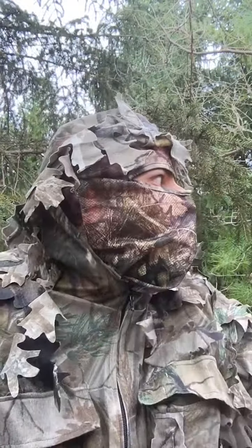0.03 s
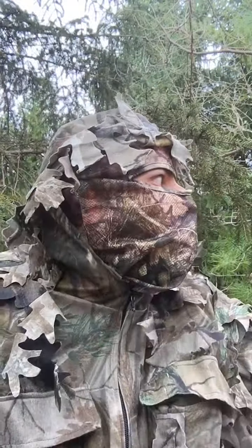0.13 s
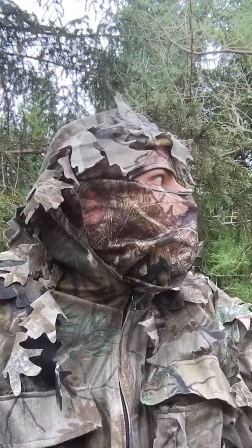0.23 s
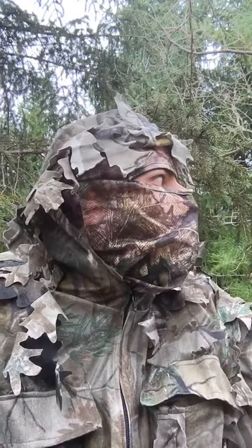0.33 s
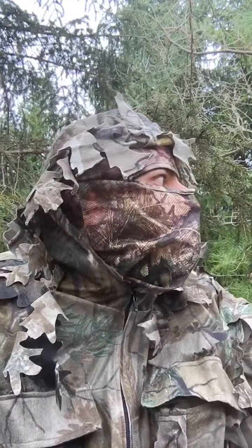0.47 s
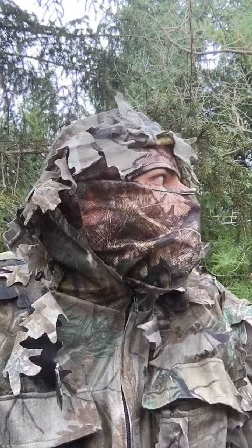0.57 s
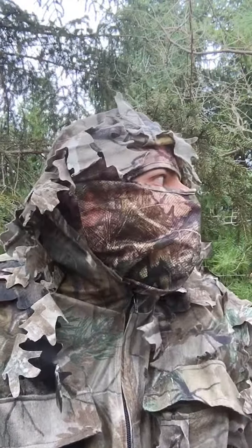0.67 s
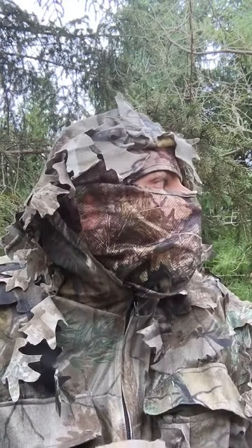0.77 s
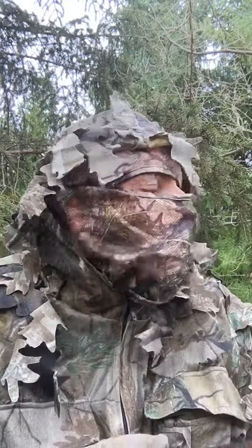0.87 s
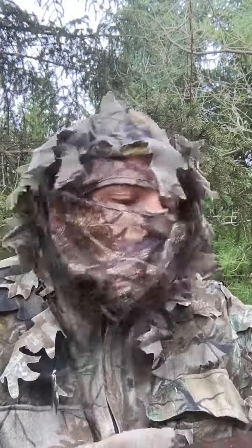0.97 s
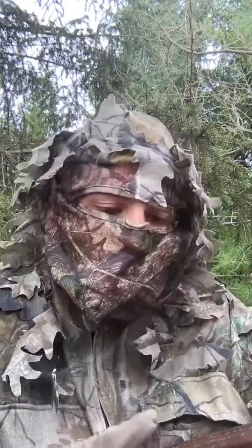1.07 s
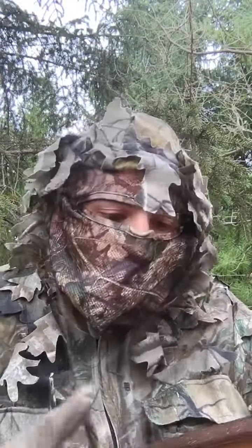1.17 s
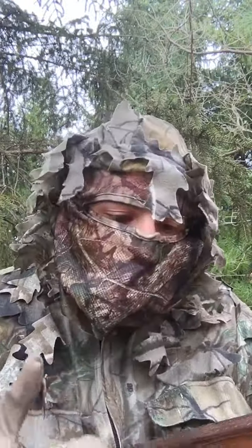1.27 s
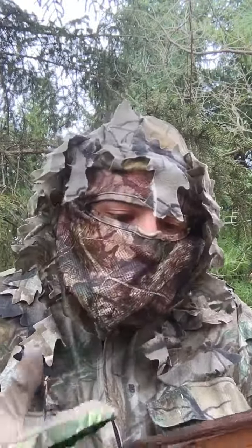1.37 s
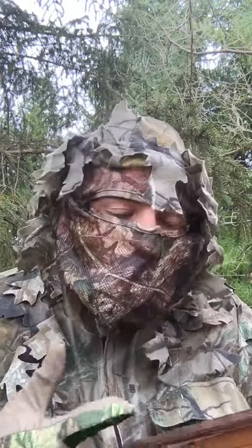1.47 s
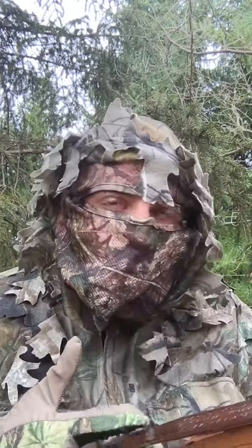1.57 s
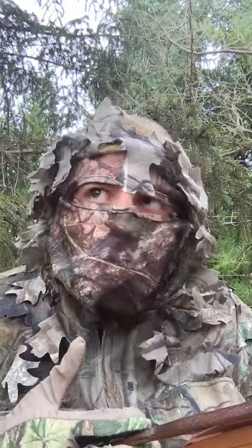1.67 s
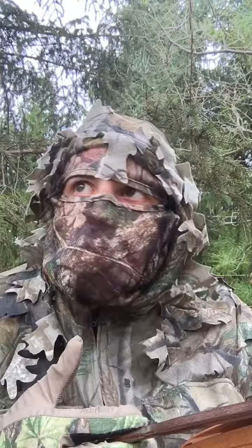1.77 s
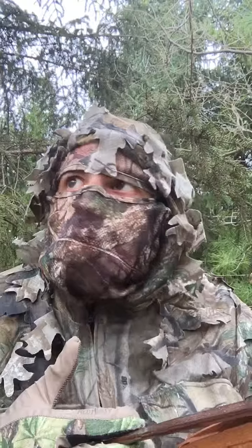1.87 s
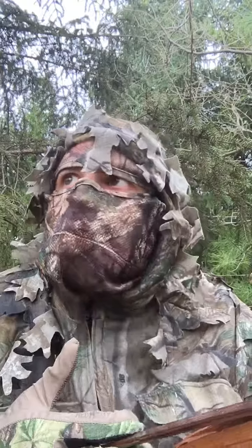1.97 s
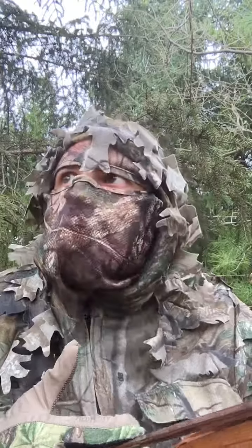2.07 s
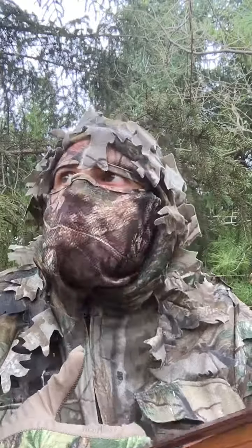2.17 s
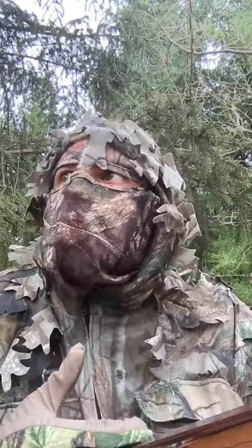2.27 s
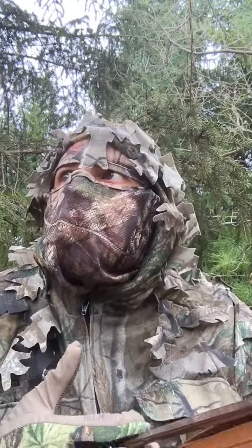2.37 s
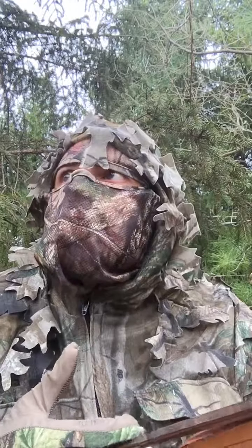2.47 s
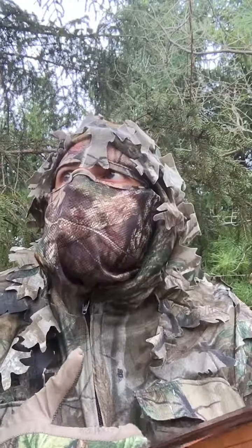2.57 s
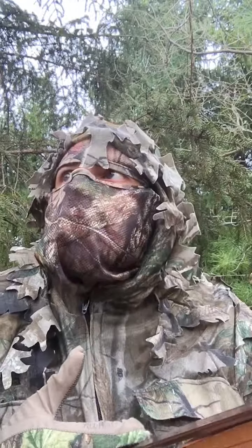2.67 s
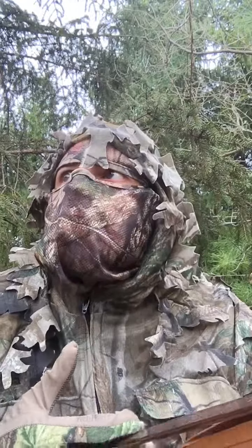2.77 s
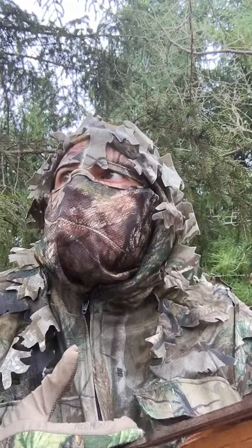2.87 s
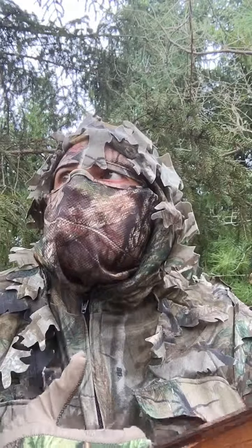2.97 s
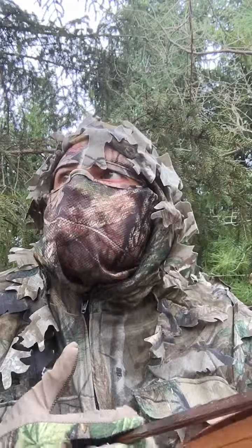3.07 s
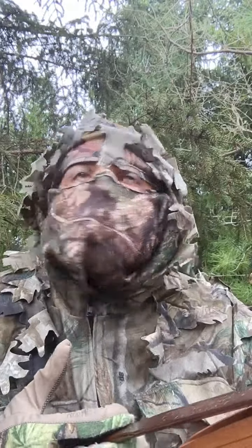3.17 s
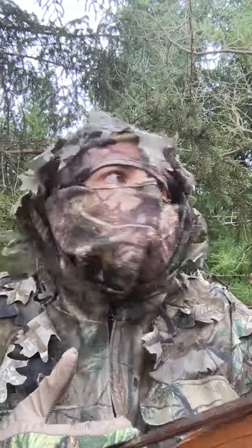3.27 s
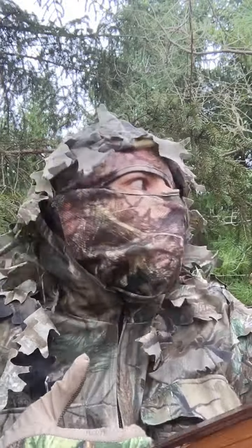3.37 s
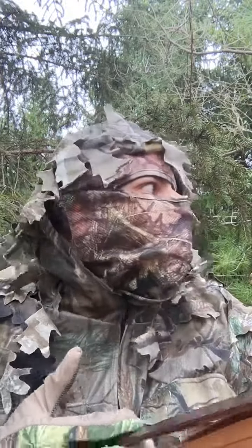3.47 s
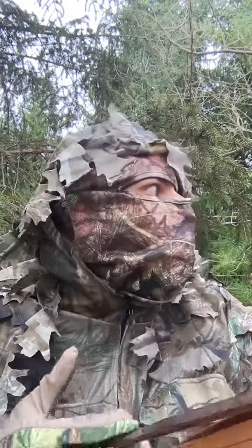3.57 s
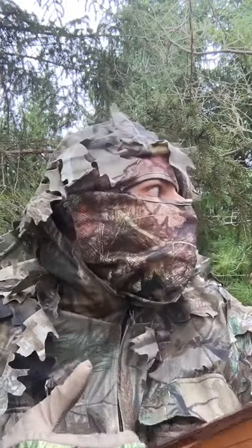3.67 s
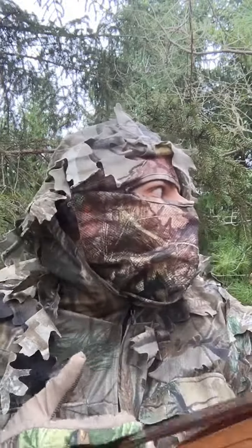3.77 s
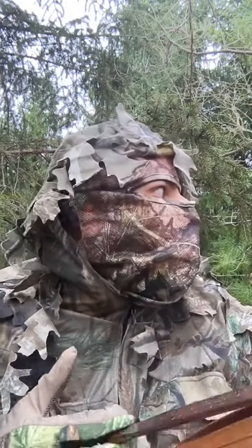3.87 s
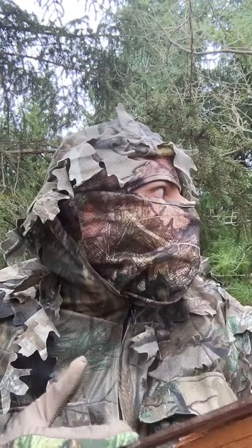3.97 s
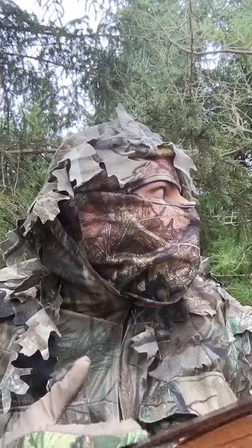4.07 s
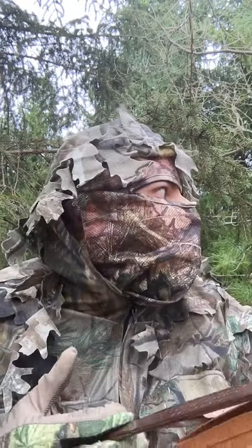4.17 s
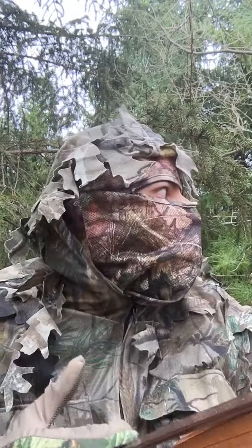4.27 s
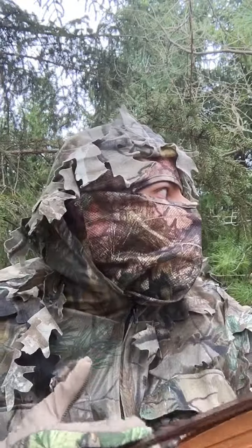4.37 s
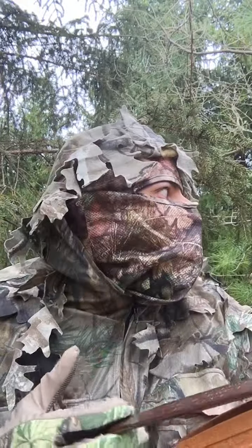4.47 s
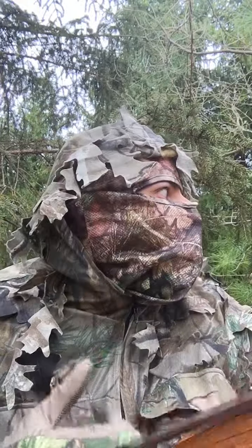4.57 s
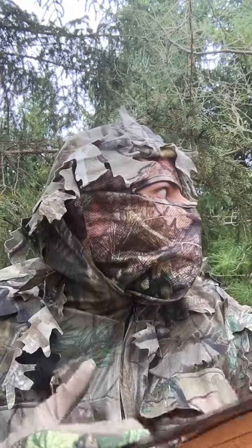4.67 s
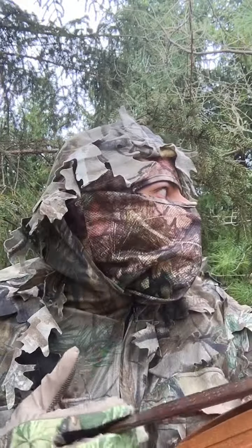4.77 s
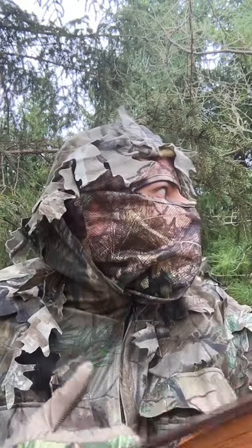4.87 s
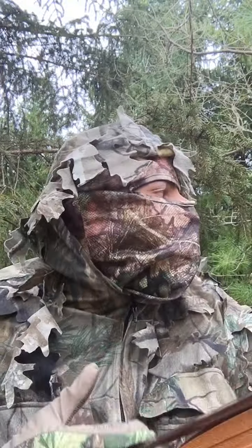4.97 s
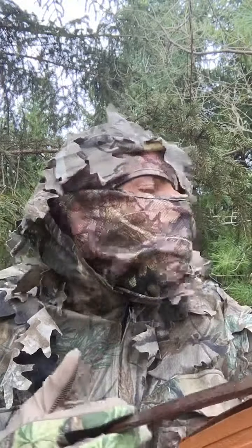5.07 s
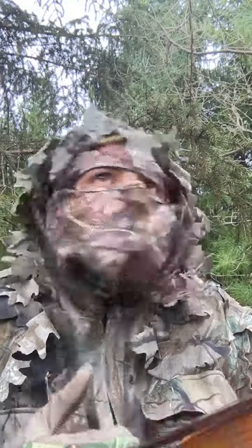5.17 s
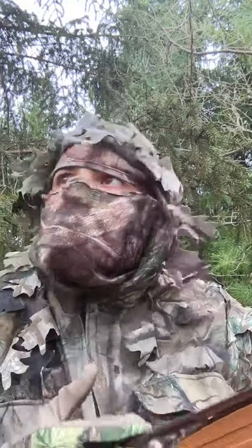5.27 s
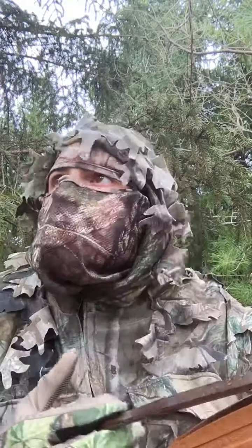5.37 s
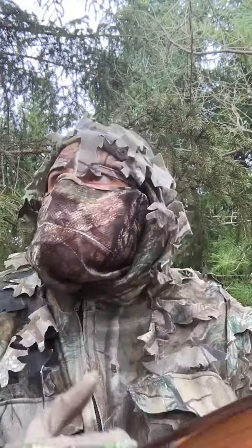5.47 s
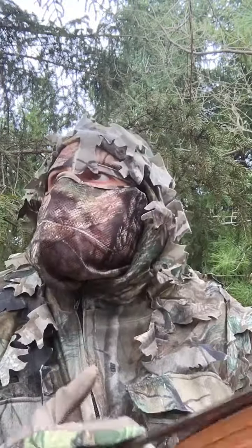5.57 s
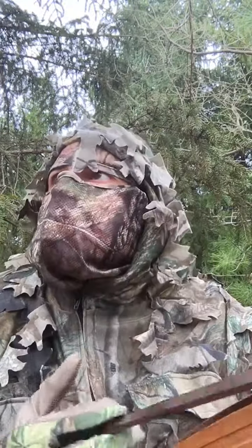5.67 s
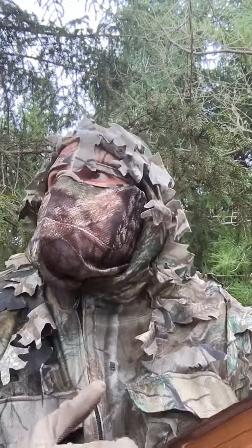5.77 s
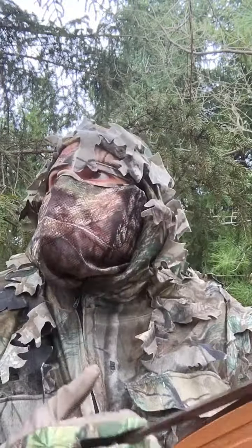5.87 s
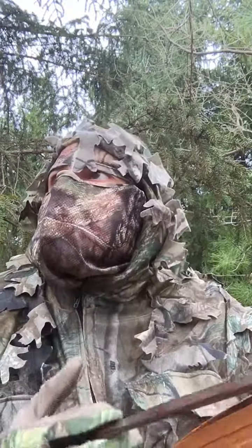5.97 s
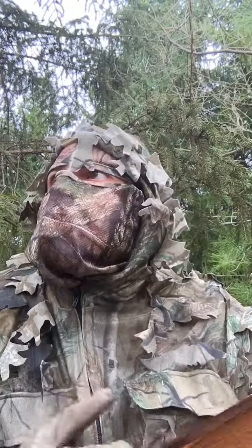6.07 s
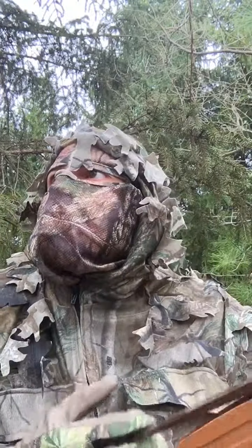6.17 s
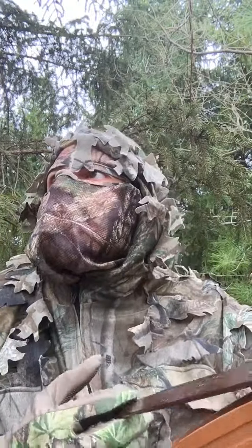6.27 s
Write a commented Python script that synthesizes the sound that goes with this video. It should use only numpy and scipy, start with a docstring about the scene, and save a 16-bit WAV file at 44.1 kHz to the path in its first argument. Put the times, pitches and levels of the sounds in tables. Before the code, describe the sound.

After a soft clothing rustle and a few wooden taps, a hand-worked box call yelps steadily like a hen turkey.

```python
"""In a quiet wood a far bird chirps once; then clothing rustles close by.
The lid of a hand-worked wooden box call taps on the box and is drawn over the rim in a run of raspy
yelps, with more taps among the first few. In each yelp the wood sticks and slips several hundred times
a second, exciting the resonances of the hollow box; a high note breaks to a low one, and the freed lid
rings. After each stroke the trees answer with faint reflections."""
import sys
import numpy as np
from scipy import signal
from scipy.fft import rfft, irfft, next_fast_len
from scipy.io import wavfile
from scipy.ndimage import uniform_filter1d, minimum_filter1d, map_coordinates

SR = 44100
rng = np.random.default_rng(int(sys.argv[2]) if len(sys.argv) > 2 else 0)


def wav_record(signal):
    """Record a signal, one row per channel, as 16-bit PCM in the file named by sys.argv[1]."""
    frames = np.transpose(np.atleast_2d(signal))
    bounded = np.clip(frames, -1, 1)
    # unit amplitude maps onto the largest positive 16-bit level
    quanta = np.round(bounded * 32767).astype(np.int16)
    wavfile.write(sys.argv[1], SR, quanta)


N = 278182


def box_call():
    """Source and resonator: the lid radiates directly, while forces on the rim are filtered by the box."""
    yelp_sound, yelp_force = yelps()
    tap_sound, tap_force = lid_taps()
    return yelp_sound + tap_sound + signal.fftconvolve(yelp_force + tap_force, box_response())[:N]


def yelps(friction_db=-1, click_db=5, free_hz=960, free_t60=0.044, free_lead_s=0.0045):
    """Forced, then free vibration: each stroke clicks, drives the lid by friction and leaves it ringing."""
    # strokes: (time [s], length [s], break after [s], high note [Hz], its glide [Hz/s], low note [Hz],
    # force [dB], high-note roughness [1], low-note roughness [1], high-note treble [dB],
    # low-note treble [dB], ring of the freed lid [dB])
    strokes = [ (2.304, .024, 0.0076, 763, -2000, 627, -12.5, 0.2, .08, -0.5, 2, -22.5),
               (2.626, .100, .066, 770, -900, 657, -12, .2, 0.1, -5, 2, -34),
               (3.034, 0.038, .012, 808, -5000, 633, -7, 0.8, 0.7, 5, -5, -13),
               (3.395, .083, .042, 786.4, -600, 675.2, -8.5, 0.4, 0, 4, -1.5, -18),
               (3.774, .024, 0.0083, 812.3, -2000, 627.6, -4.5, 0.3, .15, 6, 0, -10),
               (4.081, 0.05, .014, 743, -2.5, 667, -6.5, 1.2, 0.2, 1, -1.5, -13.5),
               (4.378, 0.054, 0.018, 781.3, -3800, 668, -9.5, .3, 0.6, 8.5, -4.5, -21.5),
               (4.669, 0.067, .049, 775, 2199.5, 673, -5.5, .35, 0.2, -0.5, -2.5, -16),
               (4.969, 0.068, .035, 775.3, 0, 678.5, -5, 0.3, .08, 7.5, -0.5, -3.5),
               (5.264, 0.054, 0.013, 767.7, -3000, 666.7, -3, .5, 0.3, 6.5, -1, -9),
               (5.560, 0.067, .045, 784.5, -400, 678.4, -5, .3, 0, 6.5, 4, -14.5),
               (5.839, 0.067, .036, 767.2, -200, 675, -8.5, 0.4, .2, 6, 2.5, -13),
               (6.136, 0.062, .039, 837, -5500, 504.6, -9.5, 0.2, 0.6, 3, -2, -5)]
    lid, rim_force = np.zeros(N), np.zeros(N)
    for start, length, break_s, high_hz, glide, low_hz, force_db, *timbre, free_db in strokes:
        squeal, friction = stick_slip(length, (break_s, high_hz, glide, low_hz, force_db, *timbre))
        add(lid, start, squeal)
        add(rim_force, start, amp(friction_db) * friction)
        add(rim_force, start, amp([force_db + click_db]))
        add(lid, start + length - free_lead_s, ringing([(free_hz, free_db, free_t60)], attack_s=0.00045))
    return lid, rim_force


def stick_slip(length, shape, waver=0.016, flicker_db=4.0, limp=0.7, scrape=0.93, squeal_db=-1.0,
               treble_hz=2500, size=5500):
    """Stick-slip friction is a relaxation oscillation; returns the lid's squeal and the force on the rim."""
    t = np.arange(size) / SR
    left_s = length - t
    rate_hz, force_db, rough, bright_db = gesture(t, length, *shape)
    cycles = np.cumsum(rate_hz * (1 + waver * rough * wobble(300, size))) / SR
    # period doubling: long and short slips alternate, adding lines halfway between the harmonics
    k = np.arange(2, 49)[:, None] / 2
    strength = np.where(k % 1 == 0, 1, limp * rough * np.sqrt(rough))
    # sliding over the grain modulates each partial's level and phase independently
    swell_db = np.array([wobble(110, size) for _ in k]) * flicker_db * np.sqrt(rough) * np.minimum(k / 2, 2)
    stray = np.array([wobble(380, size) for _ in k]) * (rough * np.sqrt(k) + (k / 15) ** 2)
    partials = strength * amp(swell_db) * np.cos(2 * np.pi * k * cycles + stray) * (k * rate_hz < SR / 2)
    pressure = amp(force_db) * np.clip((left_s + 0.0092) / .011, 0, 1)  # the lid lifts off gradually
    # the lid bends twice a slip, widest as the resting grip breaks, and fades as the grip loosens
    bend = partials[2]
    onset = (1 - np.exp(-t / .0005)) * (1 + 1.4 * np.exp(-t / .005))
    squeal = amp(squeal_db) * bend * pressure * onset * np.clip(left_s / 0.004, 0, 1)
    slips = 2 * np.sqrt(rate_hz / SR) * (partials.sum(0) - bend)
    # chalked grain scrapes during the sliding part of each cycle
    grit = scrape * rough * unit(np.cos(np.pi * cycles) ** 4 * rng.standard_normal(size))
    force = (slips + grit) * pressure * (1 - np.exp(-t / .005))  # builds over a few cycles
    # a sharper slip carries more treble, which is the first to go as the lid lifts
    soft = filtered(force, lambda hz: 1 / (1 + (hz / treble_hz) ** 4))
    treble = amp(bright_db) * (force - soft) * np.clip(left_s / 0.0024, .35, 1)
    return squeal, soft + treble


def gesture(t, length, break_s, high_hz, glide, low_hz, force_db, high_rough, low_rough, high_db, low_db,
            drop_s=.009, sag_hz_per_s=880, catch_s=.011, ease_s=0.011):
    """Slip rate sets pitch: a high note breaks to a sinking low one as force, rasp and treble change."""
    low = (1 + np.tanh(2 * (t - break_s) / drop_s)) / 2
    blend = lambda before, after: before + (after - before) * low
    breaking = np.sin(np.pi * low)
    catch = np.exp(-(t / catch_s) ** 2)  # the first catch is higher, harsher, weaker and duller
    ease = np.exp(-np.maximum(length - t, 0) / ease_s)  # the hand eases off towards the end
    rate_hz = blend(high_hz + glide * t, low_hz - sag_hz_per_s * (t - break_s)) + 37.8 * catch
    level_db = force_db - 6 * catch + 0.5 * breaking - 5 * ease
    rough = blend(high_rough, low_rough) + 0.89 * catch + 0.05 * breaking + 0.27 * ease
    bright_db = blend(high_db, low_db) - 10.5 * catch - 7 * ease
    return rate_hz, level_db, np.clip(rough, .05, 1), bright_db


def lid_taps(knock_db=12, free_pitch_hz=1690, held_loss_db=-70):
    """Impact excitation: the lid lands on the rim and rings, lower when it is held against it."""
    # modes of the free lid: (frequency [Hz], level [dB], t60 [s])
    lid_modes = [(945, -5, .04), (1260, -10, .02), (1690, 0, .034), (2003, -12, .02), (2659, -23, .024),
                 (2832, -20, .024), (3688, -15, .022), (4667, -14, .011), (6412, -23, .01)]
    # landings: (time [s], lid ring [dB], relative box knock [dB], ring pitch [Hz])
    taps = [(1.611, -27, -30, 1287), (2.211, -26, -30, 1580), (2.224, -17, -39, 1653),
            (2.62, -21, -33, 1560), (2.990, -15, -20, 1600), (2.999, -2, -17, 1690),
            (3.389, -15, -23, 1500), (3.724, -11, -11, 1360), (3.732, -3, -7, 1660), (3.735, -3, -16, 1680)]
    lid, rim_force = np.zeros(N), np.zeros(N)
    for start, ring_db, box_db, pitch_hz in taps:
        ratio = pitch_hz / free_pitch_hz
        modes = np.array(lid_modes) * [ratio, 1, 1]
        modes[0, 1] += held_loss_db * (1 - ratio)  # holding weakens the lowest mode
        add(lid, start, amp(ring_db) * ringing(modes, attack_s=.0003))
        add(rim_force, start, amp([box_db + knock_db]))
    return lid, rim_force


def ringing(modes, attack_s):
    """Free vibration of wood: exponentially damped modes (frequency [Hz], level [dB], t60 [s])."""
    t = np.arange(SR // 10) / SR
    ring = sum(amp(db - 60 * t / t60) * np.sin(2 * np.pi * hz * t) for hz, db, t60 in modes)
    bass_cut = signal.butter(4, 600, "high", fs=SR, output="sos")
    return signal.sosfilt(bass_cut, ring * (1 - np.exp(-t / attack_s)))


def box_response(cutoff_hz=610, low_bump_db=-30, low_bump_hz=320, size=4096):
    """Impulse response of the box's resonances, with the bass cut and a faint low bump added."""
    # resonances of the box with the lid pressed on: (frequency [Hz], bandwidth [Hz], relative level [dB])
    box_modes = [(766, 240, -9), (1067, 370, 3.5), (1317, 130, 6.5), (1830, 100, -6.5), (2236, 520, 0),
                 (2390, 420, -10.5), (3505, 320, 2.5), (3726, 150, 5.5), (4840, 670, -13), (5410, 240, -10),
                 (5885, 600, -8), (6680, 850, -23), (8120, 820, -22.5), (9250, 1900, -27),
                 (11040, 570, -34), (14000, 10000, -42)]
    hz = np.fft.rfftfreq(size, 1 / SR)
    peak = lambda centre, width, db: amp(db) / (1 + (2 * (hz - centre) / width) ** 2)
    bass_cut = 1 - 1 / (1 + (hz / cutoff_hz) ** 10)
    gain = sum(peak(*mode) for mode in box_modes) * bass_cut + peak(low_bump_hz, low_bump_hz, low_bump_db)
    # folding the cepstrum gives a causal, minimum-phase response
    cepstrum = irfft(np.log(np.maximum(gain, 1e-3)))
    cepstrum[1:size // 2] *= 2
    cepstrum[size // 2 + 1:] = 0
    ring = irfft(np.exp(rfft(cepstrum)))
    return ring / np.linalg.norm(ring)


def reflections(call, nearby_db=-25, trees_db=-48):
    """Scattering: the caller's body returns a short tail of the call, the trees a longer, fainter one."""
    # what the surroundings send back: (frequency [Hz], level [dB])
    reflectance = [(600, -14.5), (1100, -12.5), (1600, -6.5), (1850, -14), (2050, -6.5), (2400, -17),
                   (2750, -12.5), (3700, -24.5), (4700, -14), (12000, -7)]
    # decay of the near reflections and of those from the trees: (frequency [Hz], t60 [s])
    nearby_decay = [(500, 0.069), (4000, 0.33), (12000, .07)]
    tree_decay = [(300, 0.77), (1500, 7), (4000, 1.7), (12000, 0.12)]
    returned = filtered(call, lambda hz: amp(along(reflectance, hz)))
    return amp(nearby_db) * echo(returned, nearby_decay) + amp(trees_db) * echo(returned, tree_decay)


def echo(x, decay):
    """Diffuse reverberation: convolution with noise in which each frequency decays at its own rate."""
    hz, t, spectra = signal.stft(rng.standard_normal(SR), SR, nperseg=256)
    tail = signal.istft(spectra * amp(-60 * t / along(decay, hz)[:, None]), SR, nperseg=256)[1]
    return signal.fftconvolve(x, tail / np.linalg.norm(tail))[:N]


def clothing(attack_s=.003, release_s=.011, tick_t60=0.019):
    """Friction noise: stiff cloth rubs in uneven catches, with a few dry ticks."""
    # rubs of sleeves and hood: (time [s], length [s], level [dB])
    rubs = [(.53, .13, -68), (.755, .03, -62), (.92, .12, -64), (1.018, .018, -53), (1.059, .07, -46)]
    # ticks of stiff cloth: (time [s], level [dB])
    ticks = [(.544, -43), (.61, -56), (.978, -44), (1.017, -45), (1.059, -44)]
    # rustle spectrum: (frequency [Hz], relative spectral density [dB])
    cloth_spectrum = [(200, -30), (420, -7), (620, -24), (850, -4), (1000, -22), (1200, -6), (1500, -8.5),
                      (1800, -2.5), (2450, -13), (2900, 4), (3500, -1), (4400, -11), (5650, -0.5),
                      (7200, -17.5), (11000, -20), (15000, -28)]
    t = np.arange(N) / SR
    level = np.zeros(N)
    for start, length, db in rubs:
        release = np.exp(-np.maximum(t - length, 0) / release_s)
        add(level, start, amp(db) * (1 - np.exp(-t / attack_s)) * release)
    level *= unit(amp(3 * wobble(110, N) + 3 * wobble(700, N)))
    for start, db in ticks:
        add(level, start, amp(db - 60 * t[:SR // 10] / tick_t60))
    return level * noise(cloth_spectrum)


def bird(start=0.12, length=0.026, from_hz=6200, to_hz=4100, db=-67):
    """A linear frequency sweep: one thin falling chirp far off."""
    progress = np.linspace(0, 1, int(length * SR))
    phase = 2 * np.pi * np.cumsum(from_hz + (to_hz - from_hz) * progress) / SR
    song = np.zeros(N)
    add(song, start, amp(db) * np.sin(np.pi * progress) * np.sin(phase))
    return song


def still_air(db=-60):
    """Stationary ambient noise: a faint hush, strongest in the bass."""
    # hush of the wood: (frequency [Hz], relative spectral density [dB])
    air_spectrum = [(24, -29), (42, -9.5), (75, -9), (150, -17.5), (270, -27), (450, -26.5), (1000, -26.5),
                    (2100, -32), (4000, -35), (8000, -43), (15000, -56)]
    return amp(db) * noise(air_spectrum)


def amp(db):
    """Decibels to amplitude ratio."""
    return 10 ** (np.asarray(db) / 20)


def unit(x):
    """Normalisation to rms 1."""
    return x / np.sqrt(np.mean(x ** 2) + 1e-20)


def along(points, hz):
    """Interpolation of (frequency [Hz], value) points on a log frequency axis."""
    knots_hz, values = np.transpose(points)
    return np.interp(np.log(hz + 1), np.log(knots_hz + 1), values)


def wobble(rate, size):
    """Smooth random modulation with rate knots a second."""
    return map_coordinates(rng.standard_normal(size), [np.arange(size) * rate / SR], mode="wrap")


def filtered(x, gain):
    """Zero-phase filtering by a gain that depends on frequency."""
    size = next_fast_len(len(x) + 8192)
    return irfft(rfft(x, size) * gain(np.fft.rfftfreq(size, 1 / SR)), size)[:len(x)]


def noise(spectrum):
    """Spectral shaping of white noise, at rms 1."""
    return unit(filtered(rng.standard_normal(N), lambda hz: amp(along(spectrum, hz))))


def add(track, start, sound):
    """Superposition of a sound on a track at start seconds."""
    part = track[round(start * SR):][:len(sound)]
    part += sound[:len(part)]


def scene():
    """Superposition of the call, its reflections and the background, in mono."""
    call = box_call()
    return (call + reflections(call) + clothing() + bird() + still_air())[None]


def record(dry, ceiling=0.92, window=89, top_hz=16000):
    """Peak limiting and band limiting: a fast gain dip holds down peaks, then the top treble is cut."""
    needed = np.minimum(1, ceiling / (np.abs(dry[0]) + 1e-9))
    gain = uniform_filter1d(minimum_filter1d(needed, window), window)
    return filtered(dry[0] * gain, lambda hz: hz < top_hz)[None]


dry = scene()
out = record(dry)
wav_record(out)
```